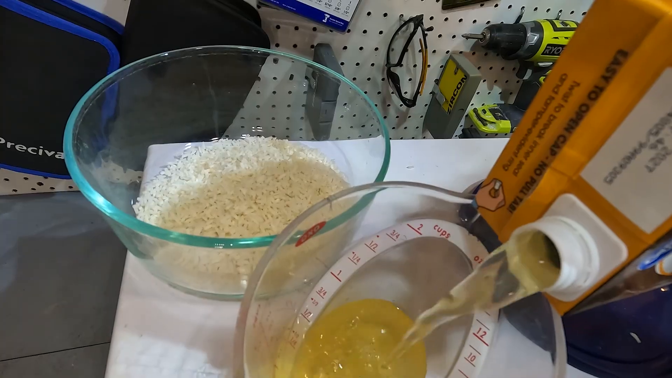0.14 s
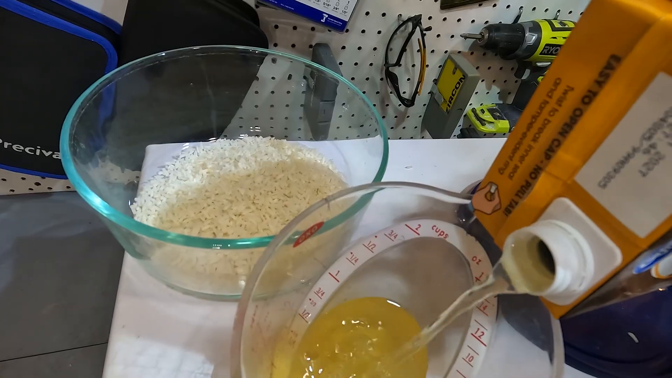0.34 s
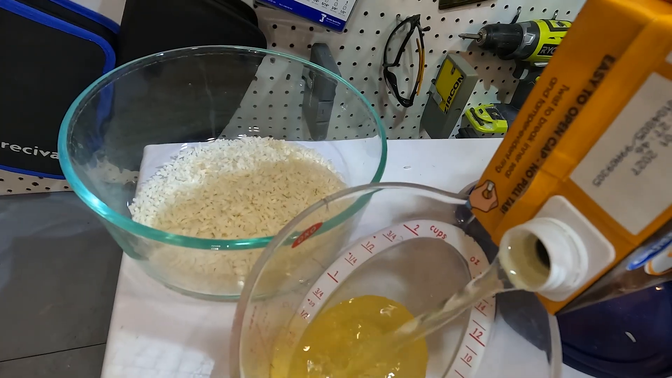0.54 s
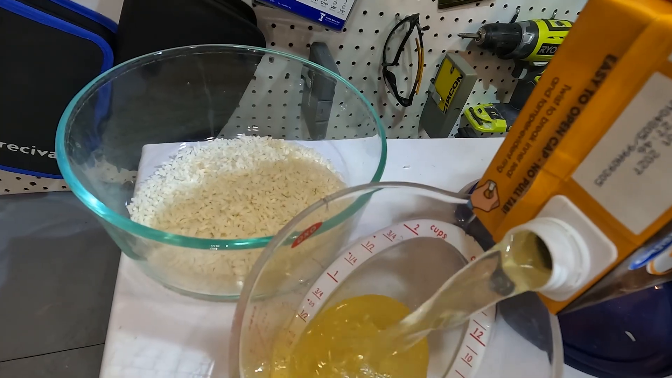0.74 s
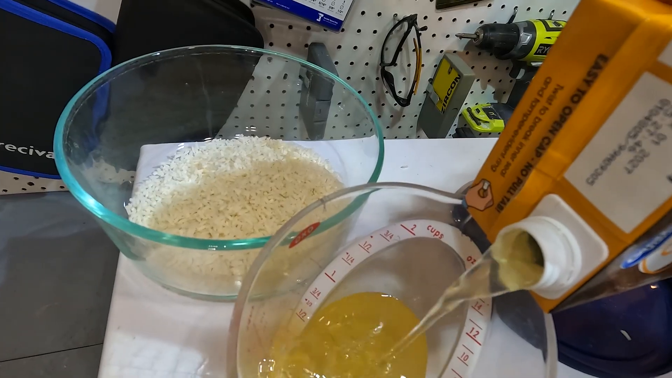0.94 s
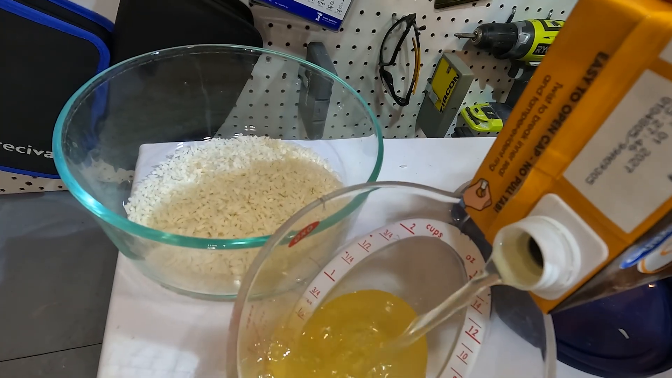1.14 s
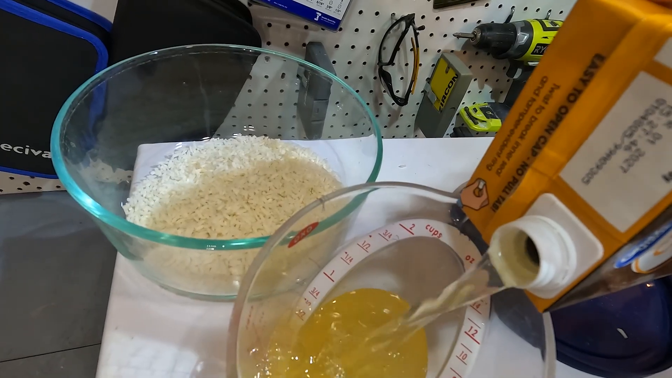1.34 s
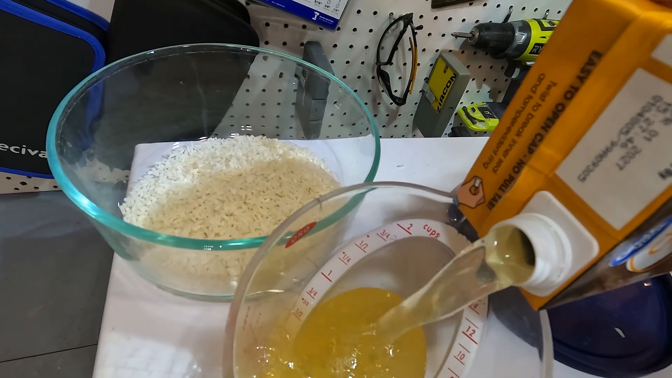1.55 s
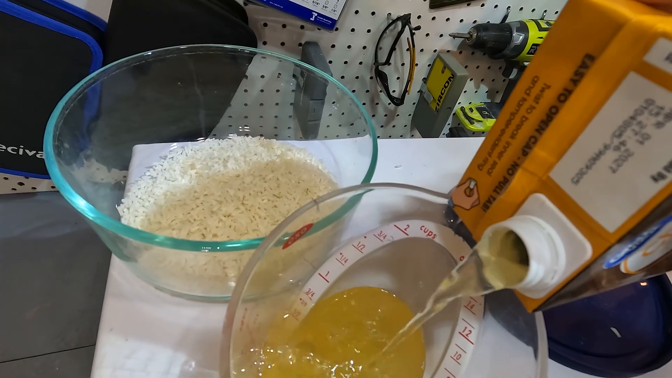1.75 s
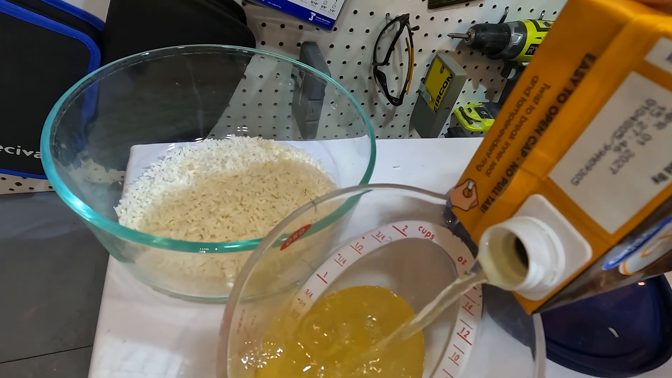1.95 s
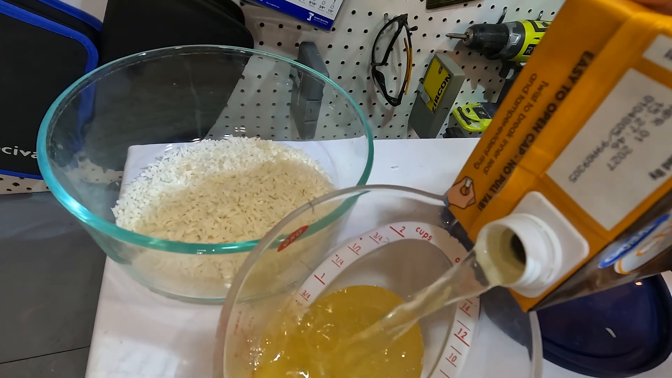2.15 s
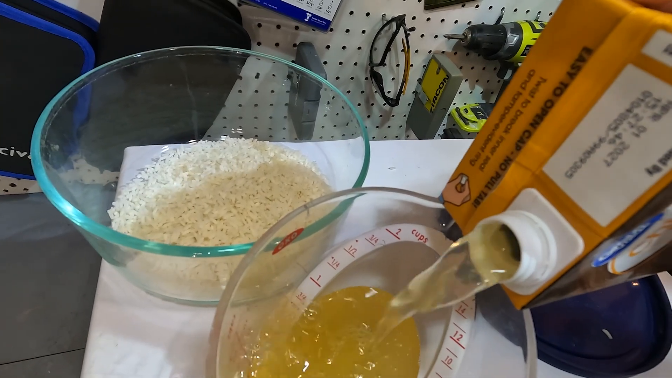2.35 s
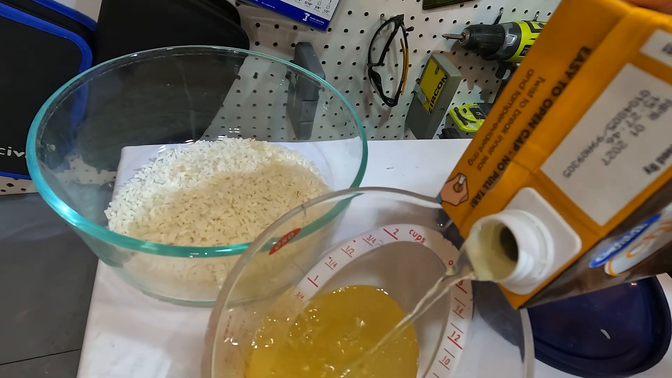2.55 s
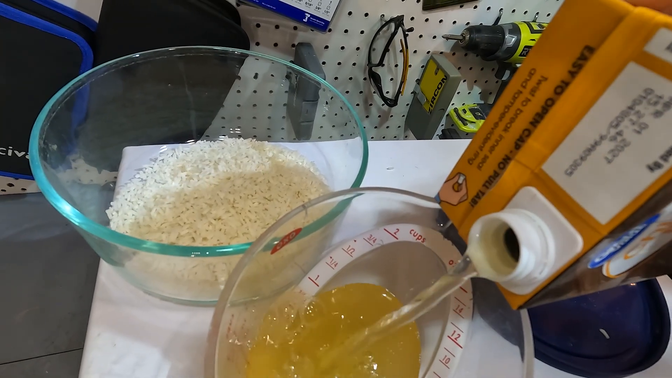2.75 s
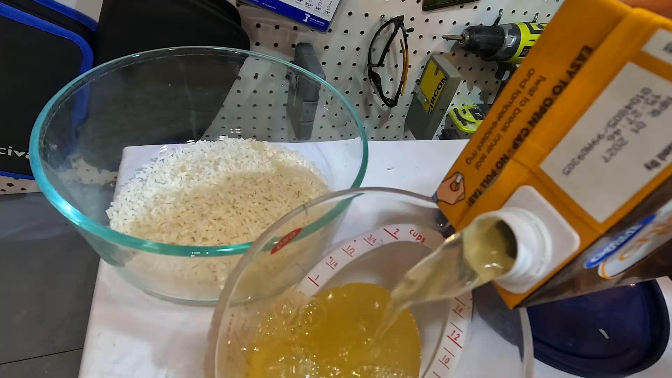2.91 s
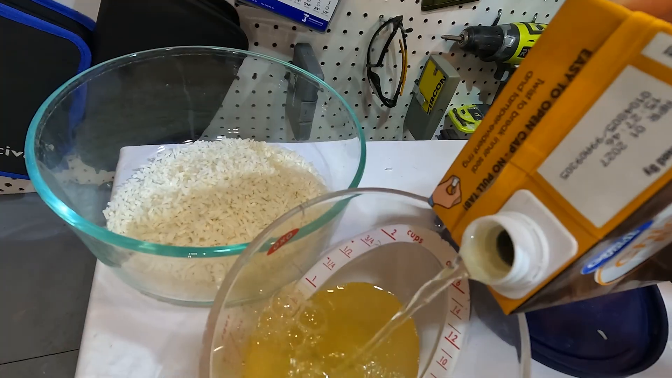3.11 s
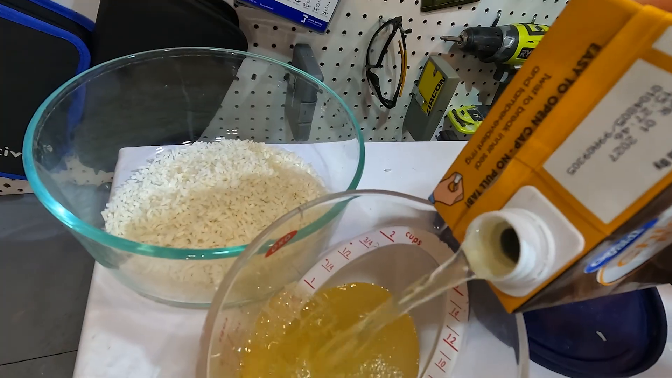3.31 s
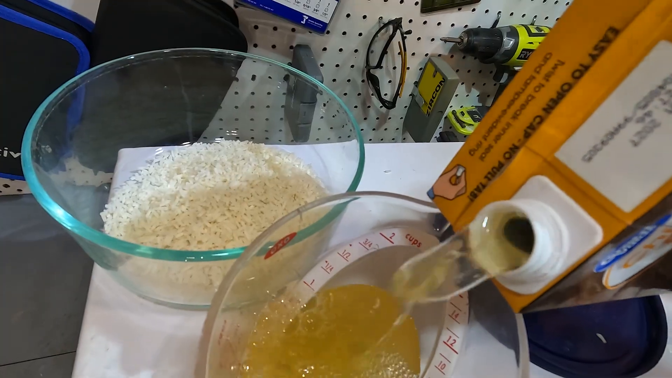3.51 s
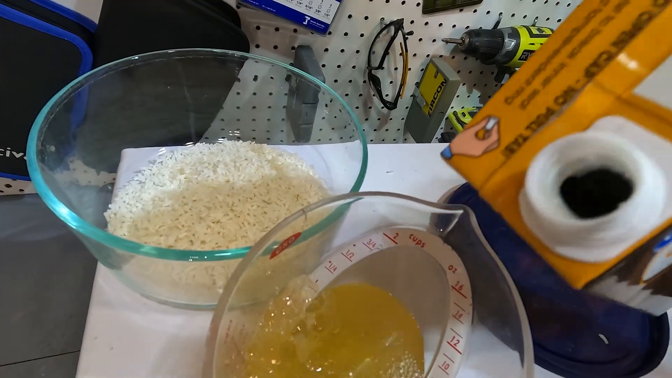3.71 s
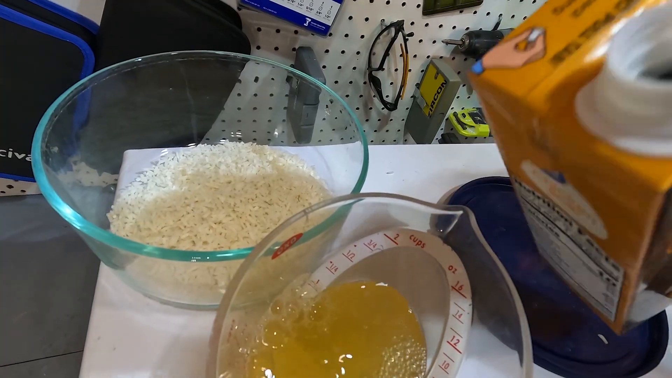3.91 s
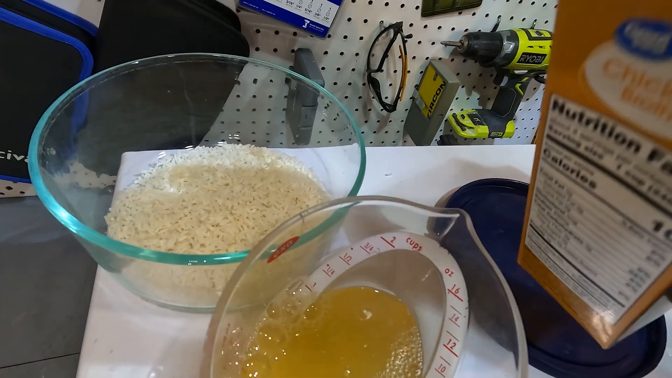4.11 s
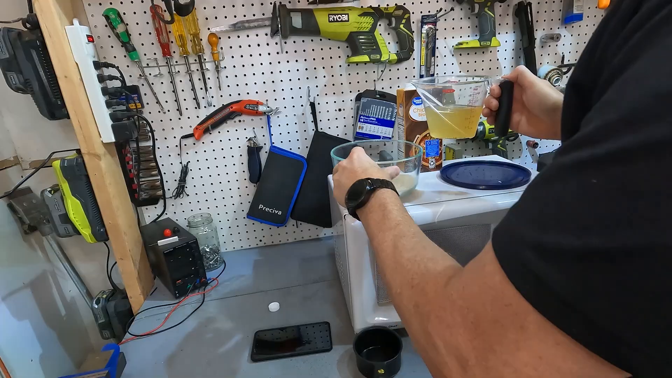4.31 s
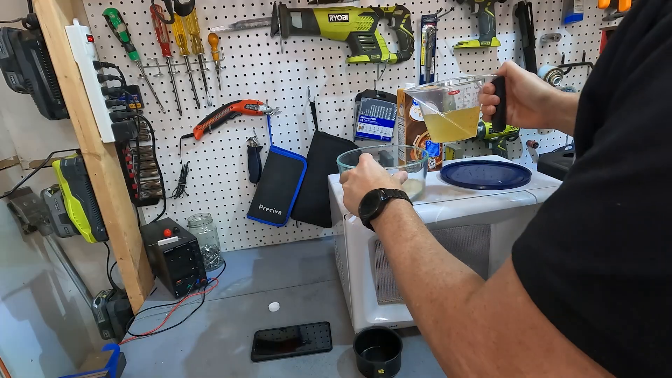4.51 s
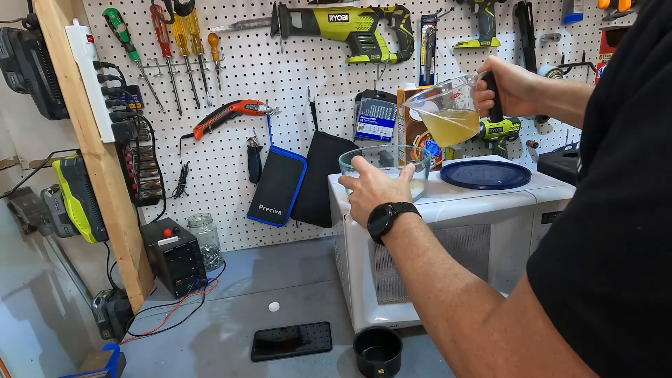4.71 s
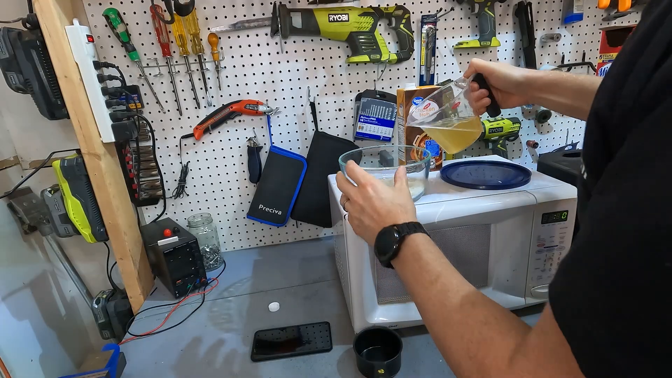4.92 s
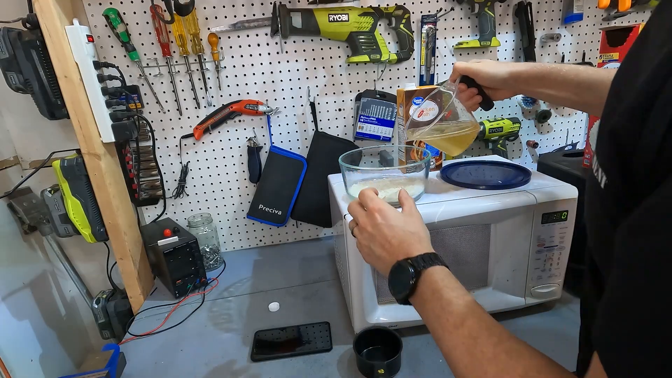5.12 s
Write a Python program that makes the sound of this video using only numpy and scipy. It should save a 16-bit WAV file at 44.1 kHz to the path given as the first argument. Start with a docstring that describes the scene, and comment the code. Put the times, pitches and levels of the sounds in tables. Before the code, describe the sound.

In a small workshop, broth pours close to the microphone from a carton into a glass measuring cup, glugging three or four times a second with wet slaps, bubbles and fine spray. The pour stops; the carton is set down softly, a hand briefly rubs glass, and a microwave door bangs with a rattling metal case. A faint trickle onto rice swells at the end. Nearly mono camera sound with steady room air.

```python
"""Broth glugs from a carton into a glass measuring cup, about 3.5 surges a second until 3.9 s: slaps of shaped noise
and ringing sine bubbles over swarms of tiny bubbles and droplets. The carton is put down (a noise bump), a hand slides
on the glass (noise through damped resonances), a microwave door bangs shut (case modes and noise clatter) and its case
rattles; last, a soft noise trickle starts. A small workshop answers, heard by a nearly mono camera."""
import sys
import numpy as np
from scipy import signal
from scipy.fft import rfft, irfft, next_fast_len
from scipy.io import wavfile
from scipy.ndimage import uniform_filter1d, map_coordinates

SR = 44100
rng = np.random.default_rng(int(sys.argv[2]) if len(sys.argv) > 2 else 0)


def store_pcm(level_fs):
    """Save levels as 16-bit WAV."""
    pcm = np.round(np.clip(level_fs, -1, 1) * 32767).astype(np.int16)
    wavfile.write(sys.argv[1], SR, np.atleast_2d(pcm).T)


N = 232098
POUR_END_S = 3.9

# surges and stray gouts slapping the surface: (time [s], level [dB]), then, relative to that level,
# (low plop [dB], spray [dB], churned bubbles [dB])
SLAPS = [(0.085, -35, -34, -37, -15), (0.307, -40, -30, -6, -30), (0.4, -37.5, -22, -27, 4),
         (0.6396, -27, -1.5, -41, -25), (.8557, -39, -43, -10, -1), (0.9266, -23.5, -2.5, -16, -33),
         (1.15, -40, -29, 2, -5), (1.2119, -29.5, -30, -11, -20), (1.228, -40, -13, 5, -28),
         (1.431, -43, -37, -28, -23), (1.6683, -40, -20, 0, -1), (1.7462, -36, -5.5, 0, -28),
         (1.7964, -36, -16, -7, 1), (1.951, -30, -21, -27, -30), (2.0073, -36, 13, -7, -23),
         (2.1384, -52.5, -9, 11, -18), (2.4231, -38.5, -17, -12.5, 1), (2.5629, -35, 5.5, 4, 5),
         (2.61, -37, -2, -7, -26), (2.7714, -33, -34, -9, -3), (2.835, -23, -10, -25, -7.5),
         (2.8806, -30.5, -28, -11.5, -12), (2.9883, -40.5, -30, -5, -17), (3.1235, -24, -7.5, -8.5, -34),
         (3.4347, -33.5, -21, -5, -14), (3.4489, -21, 0.5, -3.5, -11), (3.6651, -34.5, -32.5, -17, -4),
         (3.7412, -24.5, -1, -7.5, -3)]
# gulps of the carton, each letting out a surge: (time [s], length [s], gurgle level [dB], droplet level [dB])
SURGES = [(.035, 0.22, -54.5, -57), (0.314, 0.11, -44, -49.5), (0.62, 0.1, -46.5, -49),
          (0.91, 0.085, -45, -46.5), (1.188, 0.089, -47, -48), (1.416, 0.14, -56.5, -57.5),
          (1.659, 0.2, -51, -52), (2.019, 0.074, -42.5, -53.5), (2.221, 0.12, -54, -55),
          (2.535, 0.067, -44, -53.5), (2.86, 0.033, -55, -45.5), (3.13, 0.098, -47, -56),
          (3.448, 0.029, -47, -67), (3.741, .06, -62, -50.5)]
# hollow plop of a soft impact: (frequency [Hz], gain [dB])
PLOP = [(30, -77), (70, -37), (105, -7.5), (140, -7), (250, -5), (420, 2), (800, -5), (1600, -13),
        (4000, -64)]
# spray and mist: (frequency [Hz], gain [dB])
SPRAY = [(3000, -2), (6000, 0), (9000, 5), (11000, -2), (13500, -7), (16000, -25)]


def amp(db):
    """Decibels to gain."""
    return 10 ** (np.asarray(db) / 20)


def unit(x):
    """Scale to rms 1."""
    return x / np.sqrt(np.mean(x ** 2) + 1e-20)


def along(points, hz):
    """(Hz, value) points read on a log frequency axis."""
    f, v = np.transpose(points)
    return np.interp(np.log(hz + 1), np.log(f + 1), v)


def curves(rows):
    """One dB value per sample for each column after the time; silent outside the rows."""
    time_s, *columns = np.transpose(rows)
    t = np.arange(N) / SR
    return [np.interp(t, time_s, column, left=-np.inf, right=-np.inf) for column in columns]


def fade(t, t60):
    """Exponential decay, 60 dB down at t60."""
    return np.exp(-np.log(1000) * t / t60)


def add(track, s, sound):
    """Mix a sound into a track at s seconds."""
    part = track[round(s * SR):][:len(sound)]
    part += sound[:len(part)]


def colour(x, spectrum):
    """Causal minimum-phase filter with the given (Hz, dB) shape."""
    size = 2 * next_fast_len(len(x) // 2 + 4096)
    gain = amp(along(spectrum, np.fft.rfftfreq(size, 1 / SR)))
    cepstrum = irfft(np.log(gain + 1e-6))
    # fold the cepstrum onto positive time
    cepstrum[1:size // 2] *= 2
    cepstrum[size // 2 + 1:] = 0
    return irfft(rfft(x, size) * np.exp(rfft(cepstrum)))[:len(x)]


def noise(spectrum, size=N):
    """Coloured noise of rms 1."""
    return unit(colour(rng.standard_normal(size), spectrum))


def burst(spectrum, t60, attack=1e-4):
    """A puff of coloured noise that rises quickly and dies away; t60 and attack in s."""
    t = np.arange(SR // 2) / SR
    return noise(spectrum, size=len(t)) * fade(t, t60) * (1 - np.exp(-t / max(attack, 1e-5)))


def bubble(t, hz, t60, rise, onset):
    """A ringing air pocket whose pitch climbs as it nears the surface; onset is in cycles."""
    pitch_hz = hz * (1 + rise * (np.minimum(t / t60, 1) - .2))
    ring = np.sin(2 * np.pi * np.cumsum(pitch_hz, axis=-1) / SR)
    return ring * fade(t, t60) * (1 - np.exp(-t * hz / onset))


def swarm(rate, low_hz, high_hz, cycles, spread_db, rise, onset):
    """Many small bubbles of random time, size, life and strength, rms 1; rate is per second."""
    t = np.arange(int(SR * min(cycles / low_hz, 1 / 45))) / SR
    when, size, life, strength = rng.random((int(rate * N / SR), 4)).T[:, :, None]
    hz = low_hz * (high_hz / low_hz) ** size
    rings = bubble(t, hz, cycles * (.5 + life) / hz, rise, onset)
    # the last factor closes each ring to zero at its cut
    rings = amp(spread_db * strength ** 2) * rings * (1 - (t / t[-1]) ** 4)
    at = (when * N).astype(int) + np.arange(len(t))
    return unit(np.bincount(at.ravel(), rings.ravel(), N)[:N])


def room(x, wet_db, build):
    """The workshop's diffuse answer: a new decaying noise tail each quarter second; build is its rise in s."""
    # decay of the workshop: (frequency [Hz], t60 [s])
    decay = [(100, 0.83), (700, 0.38), (3000, 0.22), (8000, 0.2), (15000, 0.22)]
    wet, size = np.zeros(N), SR // 4
    for start in range(0, N, size):
        hz, t, bins = signal.stft(rng.standard_normal(SR * 3 // 4), SR, nperseg=256)
        envelope = fade(t, along(decay, hz)[:, None]) * (1 - np.exp(-t / build))
        tail = signal.istft(bins * envelope, SR, nperseg=256)[1]
        tail /= np.linalg.norm(tail)
        add(wet, start / SR, signal.fftconvolve(x[start:start + size], tail))
    return x + amp(wet_db) * wet


def air():
    """Steady coloured noise of the room's air."""
    # (frequency [Hz], density [dB per Hz])
    air_shape = [(15, -41), (25, -17), (301, -3.5), (677, -3), (754, -15), (840, 2), (1070, -5), (1400, -6),
                 (1700, -9), (2760, -16), (5000, -24.5), (9070, -29), (16000, -34.5)]
    return amp(-53) * noise(air_shape)


def side_hiss():
    """Faint steady noise heard only in the side signal."""
    # (frequency [Hz], density [dB per Hz])
    side_hiss_shape = [(20, -16), (100, -20), (400, -28.5), (2000, -43), (16000, -27)]
    return amp(-74.5) * noise(side_hiss_shape)


def trickle():
    """The cup tips and broth starts to soak into the rice: coloured noise that swells, then holds."""
    # (time [s], level [dB])
    trickle_level = [(4.95, -60), (5.08, -52.5), (5.16, -48), (5.26, -48)]
    # (frequency [Hz], density [dB per Hz])
    soak_shape = [(88, -20), (150, -6.5), (477, -4.5), (612, -8.5), (661, -6), (833, -3), (1160, -12),
                  (2860, -19.5), (15000, -65)]
    return amp(curves(trickle_level)[0]) * noise(soak_shape)


def carton():
    """The carton is set down with a soft bump of low noise."""
    out = np.zeros(N)
    add(out, 4.138, amp(-41.5) * burst(PLOP, t60=0.11, attack=0.0016))
    return out


def glass_ring():
    """The cup's wall after one small tap: decaying sine modes."""
    # wall modes: (frequency [Hz], level [dB], t60 [s])
    wall_modes = [(2380, 25, 0.12), (4200, 13.5, 0.098), (6530, 19.5, 0.11), (8950, -19, 0.073)]
    t = np.arange(SR // 2) / SR
    return sum(amp(db) * np.sin(2 * np.pi * hz * t) * fade(t, t60) for hz, db, t60 in wall_modes)


def rub():
    """A hand slides briefly on the glass; its touch damps the wall, so the resonances hiss in broad bands."""
    # friction before the mix gains: (time [s], level [dB])
    rub_level = [(4.222, -93), (4.245, -57), (4.32, -63), (4.365, -65.5), (4.41, -86)]
    # (frequency [Hz], density [dB per Hz])
    skin_shape = [(1500, -20), (2500, -3), (4300, 5), (6300, -6), (8500, 1.5), (11000, -6.5), (16000, -15)]
    friction = amp(curves(rub_level)[0]) * noise(skin_shape)
    t = np.arange(SR // 2) / SR
    damped = glass_ring() * fade(t, .016)
    damped /= np.linalg.norm(damped)
    return amp(9) * friction + amp(8.5) * signal.fftconvolve(friction, damped)[:N]


def door():
    """The latch cracks, the door's panels clatter and every blow rings the case's sheet-metal modes."""
    # the blow and the rattles after it: (time [s], case ring [dB], clatter [dB], latch crack [dB])
    blows = [(4.4696, -28.5, -15.5, -26.5), (4.477, -35.5, -24.5, -53), (4.504, -45.5, -47, -59),
             (4.560, -37.5, -23, -39.5), (4.611, -56, -27.5, -67)]
    # sheet-metal case modes: (frequency [Hz], level [dB], t60 [s])
    case_modes = [(70, -15, .6), (115, -4, .28), (128, 5, .34), (158, 6, .33), (174, -2, .28),
                  (206, 1, .45), (267, -12, .5), (329, 0, .5), (371, -2, .5), (415, -8, .5), (490, -5, .55),
                  (557, -8, .4), (697, -4, .5), (790, -1, .5), (826, -2, .45), (1104, -5, .3),
                  (1225, 0, .22), (1335, 6, .25)]
    # (frequency [Hz], density [dB per Hz])
    clatter_shape = [(35, -65), (60, -35), (118, -12), (207, -15), (238, -13), (371, -7.5), (621, -8.5),
                     (803, -2), (924, -10.5), (1310, -8), (1410, -9.5), (1700, -11), (5210, -29),
                     (16000, -66)]
    # (frequency [Hz], gain [dB])
    latch_shape = [(500, -61), (1300, -13), (2800, 5), (5500, 8), (9000, -2), (16000, -11)]
    # the door's low end, cut steeply below 60 Hz: (frequency [Hz], gain [dB])
    door_bass_shape = [(25, -47), (60, 2), (82, 6), (100, -4), (122, 3.5), (2000, 1.5)]
    ring, clatter, t = np.zeros(N), np.zeros(N), np.arange(SR) / SR
    hz, mode_db, t60 = np.transpose(case_modes)[:, :, None]
    for s, ring_db, clatter_db, crack_db in blows:
        strength_db, shape = rng.standard_normal((2, len(case_modes), 1))
        # the struck spot moves with some modes and against others
        modes = np.sign(shape) * amp(mode_db + strength_db) * np.sin(2 * np.pi * hz * t) * fade(t, t60)
        add(ring, s, amp(ring_db - 2.5) * modes.sum(axis=0) * (1 - np.exp(-t / 0.0011)))
        add(clatter, s, amp(clatter_db) * burst(clatter_shape, t60=0.19))
        add(clatter, s, amp(crack_db) * burst(latch_shape, t60=0.054))
    return colour(room(ring, wet_db=-20, build=0.031) + room(clatter, wet_db=-7, build=0.0056), door_bass_shape)


def cup(x):
    """Quick reflections from the surfaces around the stream."""
    # cup wall, bowl, pegboard: (delay [s], level [dB])
    reflections = [(.0029, -22.5), (.0053, -18), (.0086, -13.5), (0.0137, -12), (0.0225, -20)]
    out = x.copy()
    for delay_s, db in reflections:
        add(out, delay_s, amp(db) * x)
    return out


def filling(x):
    """The splashing changes colour steadily: the gurgle deepens and more spray clears the rim as the cup fills."""
    # (frequency [Hz], gain when empty [dB], gain when full [dB])
    fill_shape = [(153, 1, -2), (493, -.5, 0.5), (1090, -1, 3), (2130, 1.5, -0.5), (3900, 3.5, 0.5),
                  (6900, 0.5, 2.5), (13000, -5, 6.5)]
    hz, empty_db, full_db = np.transpose(fill_shape)
    fill = np.minimum(np.arange(N) / SR / POUR_END_S, 1)
    empty = colour(x, np.c_[hz, empty_db])
    full = colour(x, np.c_[hz, full_db])
    return (1 - fill) * empty + fill * full


def surging(levels_db, between_db):
    """The stream's level: each surge rises, sags and ebbs over a thin flow, all broken into uneven lumps."""
    attack_s, sag_db_per_s, ebb_t60_s = 0.004, 36, 0.11
    settle_t60_s = 1  # froth after the stream stops
    lumps_per_s, lumps_db = 45, 2.5
    t = np.arange(N) / SR
    level = amp(between_db) * fade(np.maximum(t - POUR_END_S, 0), settle_t60_s)
    for (s, length_s, *_), db in zip(SURGES, levels_db):
        held = amp(db - sag_db_per_s * t) * (1 - np.exp(-t / attack_s))
        add(level, s, held * fade(np.maximum(t - length_s, 0), ebb_t60_s))
    lumps = map_coordinates(rng.standard_normal(size=512), [t * lumps_per_s], mode="wrap")
    return level * unit(amp(lumps_db * lumps))


def aftermath(levels_db, t60, attack):
    """A level that swells after each slap and ebbs away; t60 and attack in s."""
    level, t = np.zeros(N), np.arange(SR // 2) / SR
    for (s, *_), db in zip(SLAPS, levels_db):
        add(level, s, amp(db) * fade(t, t60) * (1 - np.exp(-t / attack)))
    return level


def stream():
    """The falling broth churns up small bubbles and scatters droplets; each slap throws up more, and a fine mist."""
    # (frequency [Hz], gain [dB])
    gurgle_shape = [(150, -72), (300, -17), (500, -8), (900, -13), (1500, -3), (2400, -2.5), (4000, -66),
                    (6000, 1)]
    # (frequency [Hz], gain [dB])
    droplet_shape = [(1800, 20), (2600, 17.5), (4000, 14), (6000, 13), (9000, 10.5), (13000, 7.5),
                     (16000, 22)]
    thin_gurgle_db, thin_droplet_db = -60.5, -66  # between surges
    spatter_db, mist_db = -14, -18  # relative to the slap and to its spray
    _, _, gurgle_db, droplet_db = np.transpose(SURGES)
    _, slap_db, _, spray_db, churn_db = np.transpose(SLAPS)

    gurgle = swarm(rate=600, low_hz=400, high_hz=4500, cycles=28, spread_db=17, rise=.2, onset=1.2)
    droplets = swarm(rate=900, low_hz=2200, high_hz=14500, cycles=40, spread_db=22, rise=.12, onset=2.5)
    spatter = swarm(rate=1300, low_hz=1800, high_hz=14500, cycles=34, spread_db=19, rise=.15, onset=2)
    mist = swarm(rate=1000, low_hz=4500, high_hz=15500, cycles=36, spread_db=19, rise=.08, onset=2)

    gurgle_level = surging(gurgle_db, thin_gurgle_db)
    gurgle_level = gurgle_level + aftermath(slap_db + churn_db, t60=0.13, attack=0.04)
    droplet_level = surging(droplet_db, thin_droplet_db)
    spatter_level = aftermath(slap_db + spatter_db, t60=0.075, attack=0.0014)
    mist_level = aftermath(slap_db + spray_db + mist_db, t60=0.17, attack=0.0014)

    out = gurgle_level * unit(colour(gurgle, gurgle_shape))
    out += droplet_level * unit(colour(droplets, droplet_shape))
    out += spatter_level * unit(colour(spatter, droplet_shape))
    out += mist_level * unit(colour(mist, SPRAY))
    return out


def slaps():
    """Each surge lands with a smack, a hollow plop and a puff of spray that pings the glass."""
    # (frequency [Hz], gain [dB])
    smack_shape = [(300, -19), (1000, 10.5), (2200, -5.5), (3000, -9.5), (4500, 2.5), (7000, -7),
                   (12000, -21)]
    out, glass = np.zeros(N), glass_ring()
    for s, db, plop_db, spray_db, _ in SLAPS:
        smack = amp(-5.5) * burst(smack_shape, t60=0.044, attack=0.002)
        # the liquid lands in ragged lumps
        lumps = uniform_filter1d(rng.standard_normal(len(smack)), SR // 500)
        smack *= unit(amp(3 * unit(lumps)))
        plop = amp(plop_db - 11.0) * burst(PLOP, t60=0.2, attack=0.0043)
        puff = burst(SPRAY, t60=0.036, attack=0.00062)
        spray = amp(spray_db - 4.0) * (puff + amp(-36.5) * glass)
        add(out, s, amp(db) * (smack + plop + spray))
    return out


def glugs():
    """Large bubbles pinch off under the stream and ring with a rising pitch."""
    # trapped bubbles: (time [s], nominal pitch [Hz], level before the layer gain [dB], t60 [s])
    large_bubbles = [(.032, 2250, -39.5, 0.018), (.084, 4340, -35, 0.024), (.153, 1470, -33, 0.014),
                     (0.209, 1194, -40.5, 0.045), (.346, 900, -39, 0.056), (.358, 847, -35.5, 0.092),
                     (.413, 1055, -36, 0.18), (.442, 1240, -29.5, .031), (.642, 810, -36, 0.065),
                     (.668, 3600, -29.5, 0.011), (.670, 2410, -38, 0.052), (0.701, 1380, -38.5, .044),
                     (.858, 1860, -32.5, 0.015), (.925, 352, -33, .031), (.989, 1590, -39.5, 0.042),
                     (1.094, 1910, -32, 0.027), (1.150, 1840, -22.5, 0.0065), (1.228, 7840, -30.5, 0.012),
                     (1.284, 844, -39.5, 0.21), (1.432, 2124, -36, 0.033), (1.749, 4030, -24, 0.0033),
                     (1.797, 1580, -32, 0.022), (1.953, 2440, -28, 0.0075), (2.005, 1020, -31, 0.06),
                     (2.008, 536.7, -35, 0.22), (2.026, 470, -33.5, 0.033), (2.089, 1172, -34.5, 0.048),
                     (2.215, 1620, -44, 0.13), (2.263, 1910, -33, 0.02), (2.289, 1201, -33.5, 0.15),
                     (2.564, 886, -29, 0.1), (2.565, 1430, -25, 0.027), (2.586, 1388, -32, 0.034),
                     (2.611, 1030, -27.5, 0.037), (2.773, 1425, -38, 0.046), (2.836, 975, -19, 0.013),
                     (2.991, 5170, -38, 0.026), (3.124, 840, -30, 0.015), (3.189, 900, -37, .05),
                     (3.449, 542, -34, 0.2), (3.472, 1190, -16, 0.012), (3.473, 422, -31.5, 0.065),
                     (3.756, 1040, -28, 0.094), (3.783, 863, -26, 0.077), (3.787, 453, -37, 0.1),
                     (3.85, 1800, -43, 0.022)]
    layer_db = 4.0
    out, t = np.zeros(N), np.arange(SR // 5) / SR
    for s, hz, db, t60 in large_bubbles:
        add(out, s, amp(db + layer_db) * bubble(t, hz, t60, rise=0.056, onset=0.53))
    return out


def scene():
    """All sources in the room; a faint, slightly decorrelated side signal lies beside the mid."""
    # side signal: (frequency [Hz], level relative to mid [dB])
    side_shape = [(30, -3), (100, -33.5), (600, -70), (1300, -65.5), (2500, -59), (4500, -32),
                  (8000, -22.5), (14000, -28)]
    broth = cup(glugs() + filling(slaps() + stream()))
    mid = room(broth + carton(), wet_db=-10.0, build=0.012) + door()
    mid = mid + rub() + trickle() + air()
    # 5 ms of noise decorrelates side from mid
    scatter = rng.standard_normal(SR // 200)
    scatter /= np.linalg.norm(scatter)
    side = colour(signal.fftconvolve(mid, scatter)[:N], side_shape) + side_hiss()
    return np.array([mid + side, mid - side])


def record(dry):
    """The camera keeps nothing above its band limit."""
    top_hz = 16000
    size = next_fast_len(N + SR // 2)
    passband = np.fft.rfftfreq(size, 1 / SR) < top_hz
    return irfft(rfft(dry, size) * passband, size)[:, :N]


dry = scene()
out = record(dry)
store_pcm(out)
```